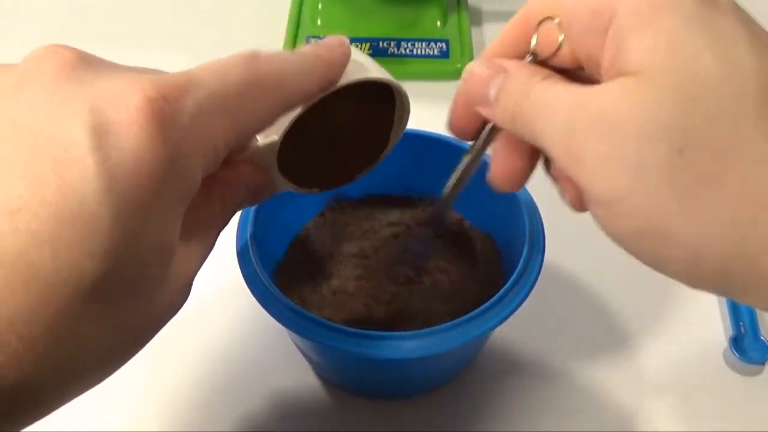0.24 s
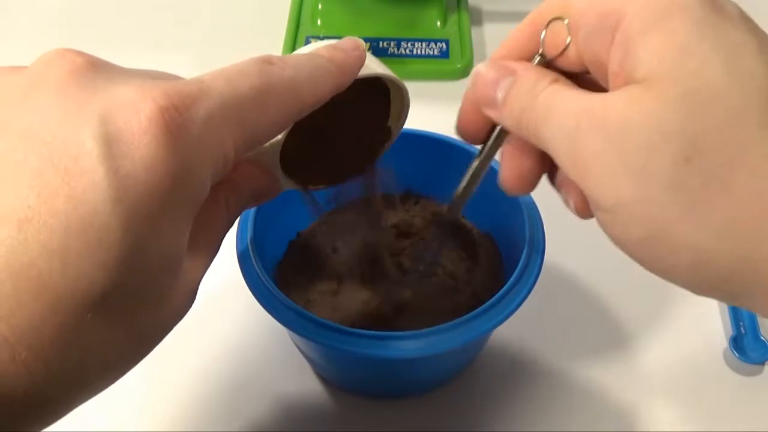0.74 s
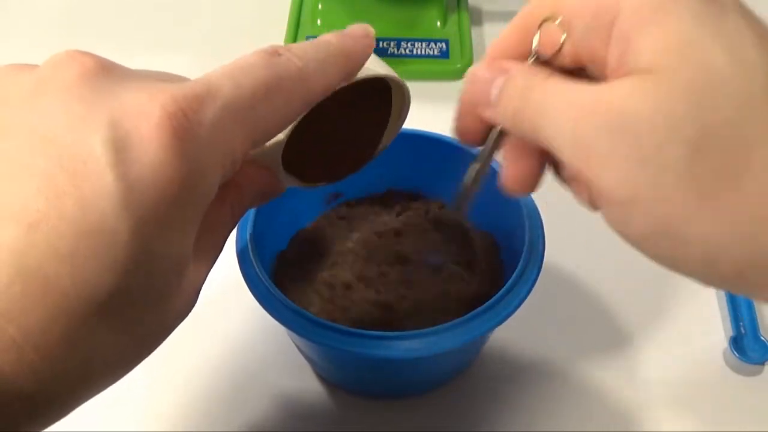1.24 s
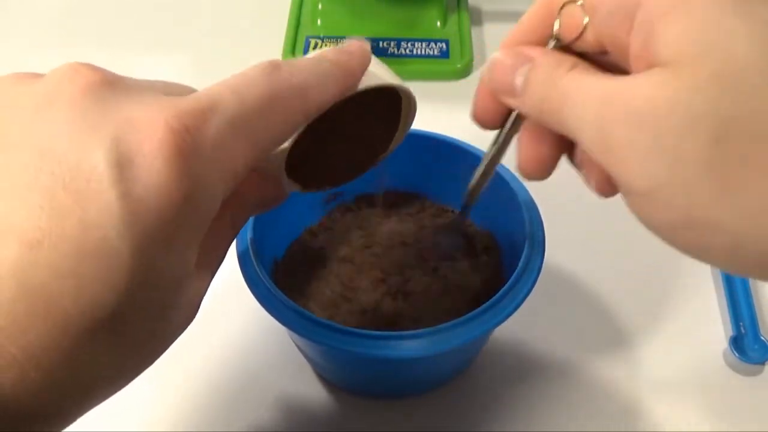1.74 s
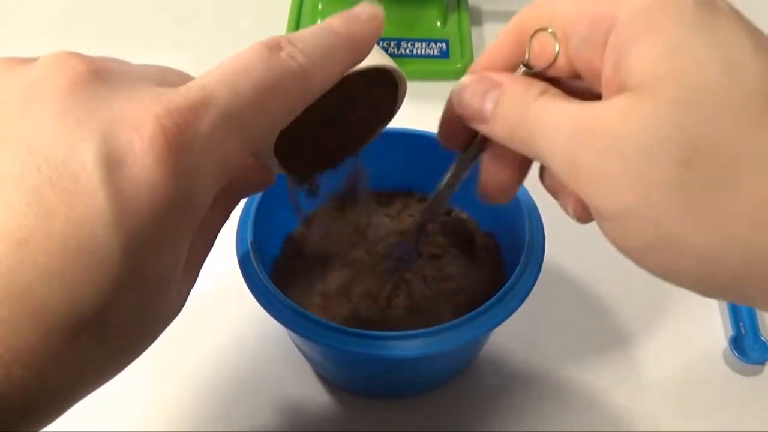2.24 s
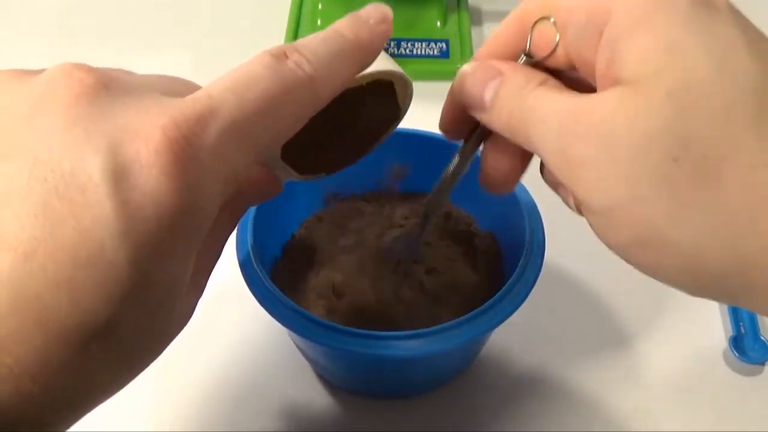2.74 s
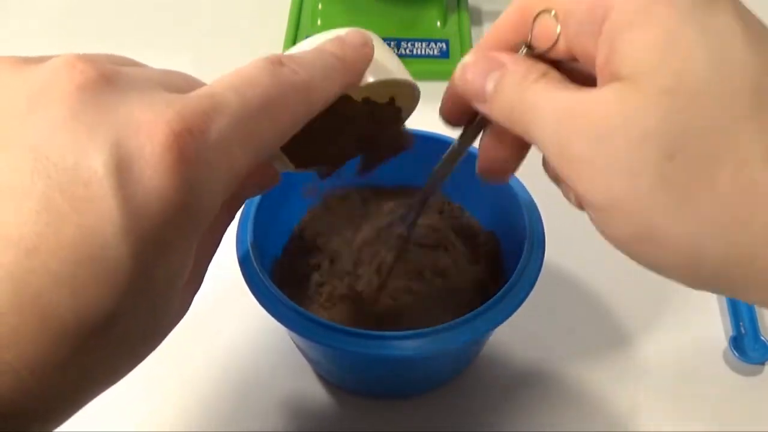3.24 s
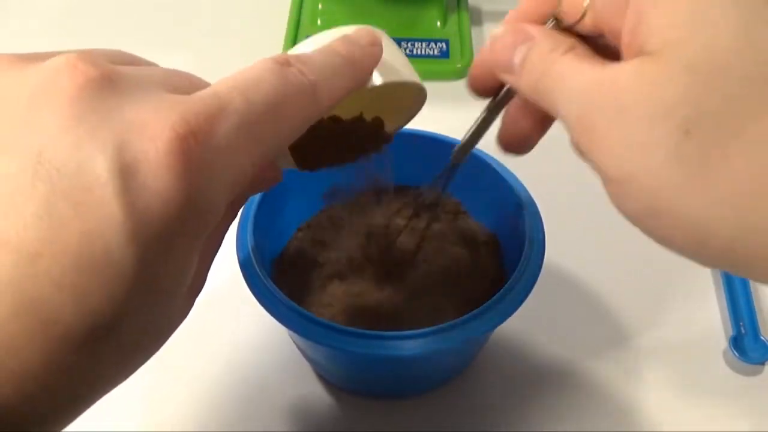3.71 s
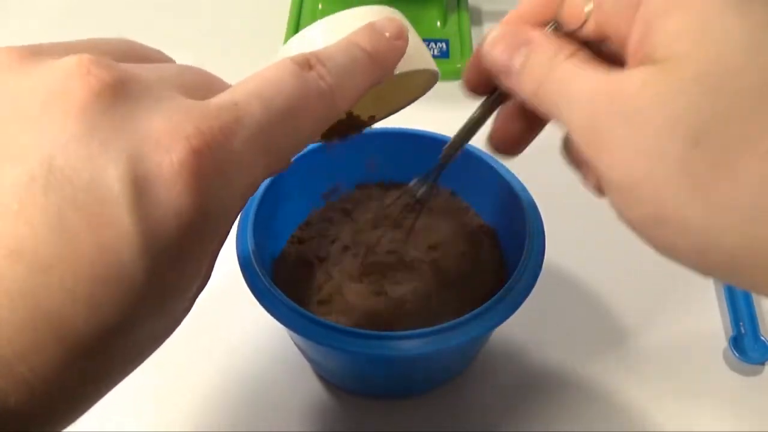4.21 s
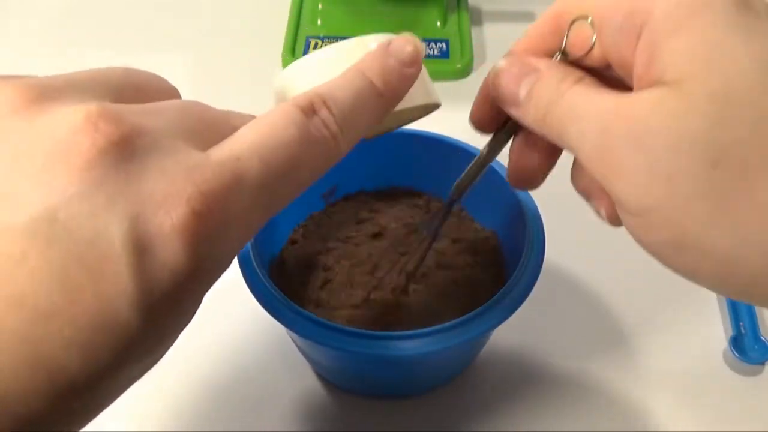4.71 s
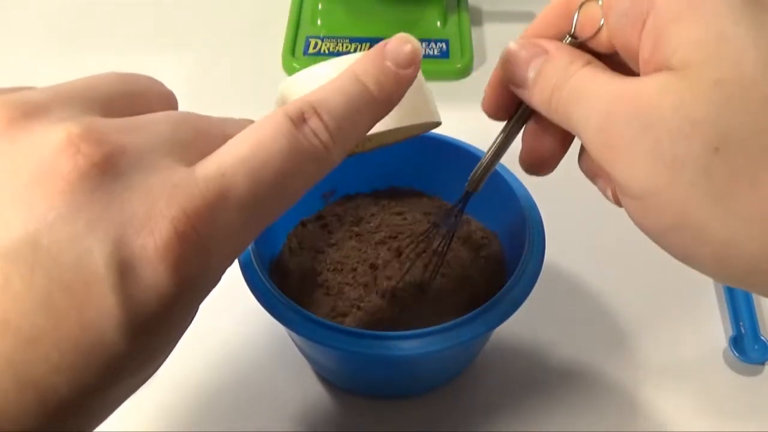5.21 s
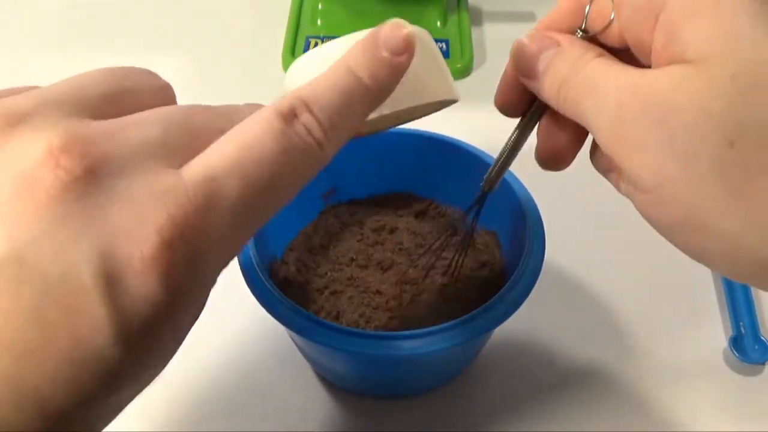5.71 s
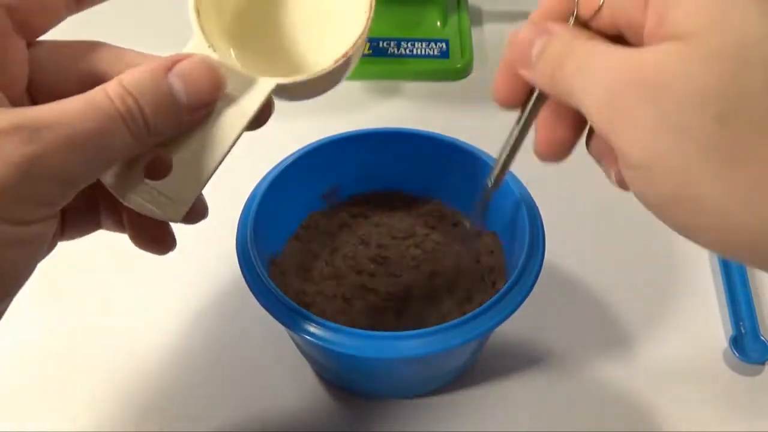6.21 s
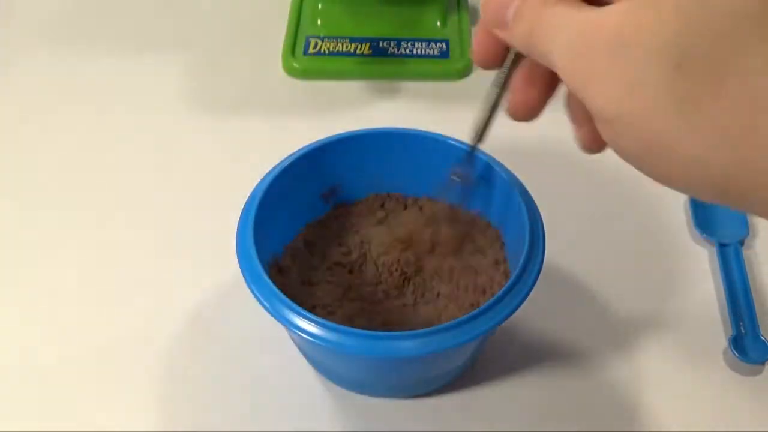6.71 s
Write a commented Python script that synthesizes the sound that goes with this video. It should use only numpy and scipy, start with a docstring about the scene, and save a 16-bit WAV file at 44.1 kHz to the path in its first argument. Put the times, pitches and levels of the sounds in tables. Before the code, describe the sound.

A small wire whisk circles briskly in a plastic bowl of damp powder, ticking and knocking the wall over soft gritty scraping.

```python
"""Wire whisk in a plastic bowl

A small wire whisk circles about four times a second in a plastic bowl of damp powder on a kitchen counter.
Bursts of wire contacts and grit dragged in between excite the resonant modes of the bowl wall.
Knocks and rocking push the low modes of the counter; all of it reaches a close pair of microphones
with a short diffuse tail and the faint air of the kitchen."""
import sys
import numpy as np
from scipy import signal
from scipy.fft import rfft, irfft, next_fast_len
from scipy.io import wavfile

SR = 44100
rng = np.random.default_rng(int(sys.argv[2]) if len(sys.argv) > 2 else 0)


def generate_wav(signal):
    """Clip the signal to [-1, 1] and save it as 16-bit WAV at the path in sys.argv[1]."""
    frames = np.transpose(np.atleast_2d(signal))
    scaled = np.clip(frames, -1, 1) * 32767
    pcm = np.round(scaled).astype(np.int16)
    wavfile.write(sys.argv[1], SR, pcm)


N = 306495   # length [samples]

# Wires meeting the wall, relative drive of three registers of modes:
# (time [s], low modes [dB], middle modes [dB], high modes [dB])
KNOCK_EVENTS = [(0.054, -19.5, -19.5, -25), (0.069, -28, -15, -41.0), (0.247, -38, -13, -29),
                (0.307, -10.5, -13, -22), (0.328, -36.5, -43, -51.5), (0.417, -42, -27.5, -32.0),
                (0.54, -20, -17.0, -27), (0.563, -33.5, -28, -37), (0.791, -16, -19, -21.5),
                (0.948, -27.5, -14.5, -27), (0.957, -34, -38, -49.5), (0.99, -36, -13, -28),
                (1.019, -20, -19.5, -24.5), (1.038, -33, -43.5, -57), (1.065, -41, -23.5, -37),
                (1.115, -49, -26.5, -42), (1.181, -38, -33, -53), (1.266, -21, -18, -28.0),
                (1.305, -37, -19.5, -33), (1.364, -53, -28, -27.5), (1.386, -50, -25.5, -44),
                (1.442, -40, -30.5, -35.5), (1.488, -36, -12.5, -26.0), (1.513, -23.5, -16.5, -27.5),
                (1.548, -35.5, -30, -41), (1.616, -68, -29, -37.5), (1.743, -41, -27, -33.5),
                (1.77, -17.0, -14, -21.5), (1.797, -27, -46, -56), (1.89, -29, -33.5, -37.5),
                (2.012, -37, -18.5, -34.5), (2.038, -32, -35.5, -38.0), (2.079, -45, -27, -40),
                (2.193, -32, -24, -47), (2.272, -44.5, -14, -32.5), (2.32, -24, -15.5, -27.5),
                (2.568, -16.5, -18, -21), (2.606, -46, -24, -36.5), (2.669, -37.5, -26.5, -33),
                (2.709, -33.5, -24.5, -48), (2.724, -27.5, -36, -54), (2.803, -30.5, -26.5, -38.5),
                (2.835, -60, -30.5, -44.5), (2.97, -39.5, -34, -56), (3.036, -39.5, -21.5, -27.0),
                (3.052, -30, -26.5, -34), (3.11, -53, -36, -61), (3.186, -46, -29.5, -55),
                (3.334, -19.5, -21.5, -25), (3.492, -50, -30, -47.5), (3.582, -20, -20, -30),
                (3.653, -53.5, -28.5, -44), (3.828, -28, -24, -31.5), (3.924, -31, -22.5, -26),
                (3.957, -31, -24, -31), (4.059, -47, -23.5, -41.5), (4.093, -21.0, -22.0, -32.5),
                (4.166, -30.5, -26, -39), (4.203, -31, -26, -43), (4.256, -32, -29.5, -45),
                (4.355, -23.5, -27, -27.5), (4.45, -46, -24.0, -30), (4.573, -20, -18.5, -27),
                (4.694, -32, -31, -43), (4.72, -38, -39.5, -39.0), (4.736, -39, -35, -65),
                (4.799, -19.5, -27.5, -27), (5.01, -48, -48, -37), (5.043, -25, -24, -25.0),
                (5.218, -39.5, -42.5, -67), (5.314, -40.5, -51, -65), (5.347, -28, -36, -50),
                (5.408, -50, -45, -49.0), (5.422, -33, -35.5, -48), (5.43, -35, -31, -51.5),
                (5.528, -17, -20.5, -25.5), (5.545, -40, -34, -35), (5.737, -19, -22.5, -24.5),
                (5.803, -34.5, -28, -33.0), (5.815, -23, -21.5, -39), (5.878, -33.0, -26, -42),
                (5.989, -22.5, -20.5, -25.5), (6.013, -38, -23, -34), (6.027, -23.5, -22.5, -32),
                (6.054, -30.5, -24.5, -26.5), (6.075, -34, -32.0, -40), (6.089, -32.5, -31.0, -38.5),
                (6.129, -32, -30, -47), (6.143, -34, -25.5, -39), (6.187, -28.5, -22, -43),
                (6.194, -22.5, -23, -27.5), (6.202, -33, -17.5, -29), (6.239, -27, -21.5, -27),
                (6.279, -58.0, -36, -31.5), (6.294, -31, -26.5, -30), (6.314, -29.5, -28.0, -31.5),
                (6.431, -19, -19.5, -27), (6.454, -29, -18.5, -26.0), (6.488, -58, -33.0, -27),
                (6.525, -35, -23, -28.5), (6.553, -24, -26, -42), (6.579, -26.5, -35.5, -59),
                (6.668, -20.0, -23, -31.5), (6.704, -28, -27, -37.5), (6.73, -34, -33, -37),
                (6.751, -27.5, -30, -23), (6.802, -28, -36, -35), (6.833, -24, -26.5, -38),
                (6.848, -31, -36, -56), (6.877, -51.5, -14.5, -29), (6.897, -39, -40, -29.5),
                (6.912, -19, -29, -28.5)]
# Modes of the bowl wall: (frequency [Hz], nominal bandwidth [Hz], relative level [dB])
BOWL_MODES = [(263.6, 29.4, -7), (379, 44.6, -6.5), (565, 41.5, -4.5), (760, 112, -6.5), (951, 102, 1.5),
              (1288, 191, 2), (1485, 147, 4.5), (1614, 192, 0), (1854, 208, -3.5), (2251, 162, 0.5),
              (2636, 317, -5.5), (3050, 242, -8.5), (4039, 239, -1), (5137, 410, -2.5), (5620, 1010, -6),
              (7190, 2150, -6.5), (8850, 1480, -2), (10590, 2170, -6.5), (12080, 1260, -12),
              (14700, 1800, -31.5)]


def amp(db):
    """Decibel definition: an amplitude ratio is ten to the power of dB / 20."""
    return 10 ** (np.asarray(db) / 20)


def rms_one(x):
    """Normalisation: divide by the root mean square, so that levels can be set afterwards."""
    return x / np.sqrt(np.mean(x ** 2) + 1e-20)


def at_hz(points, hz):
    """Logarithmic frequency axis: interpolate (frequency, value) pairs in the logarithm of frequency."""
    points = np.array(points)
    return np.interp(np.log(np.maximum(hz, 1)), np.log(points[:, 0]), points[:, 1])


def resonate(x, hz, width_hz):
    """Damped resonance: a two-pole filter whose pole radius sets the bandwidth, with gain 1 at the peak."""
    r = np.exp(-np.pi * width_hz / SR)
    zeros = [(1 - r * r) / 2, 0, (r * r - 1) / 2]
    poles = [1, -2 * r * np.cos(2 * np.pi * hz / SR), r * r]
    return signal.lfilter(zeros, poles, x + 1e-18)


def drift(rate_hz):
    """Low-passed noise: two equal real poles leave a slow random wander of spread about 1."""
    r = np.exp(-2 * np.pi * rate_hz / SR)
    wander = signal.lfilter([1], [1, -2 * r, r * r], rng.standard_normal(N + SR))
    return rms_one(wander[SR:])    # the first second lets the filter settle


def room_tone():
    """Stationary noise: spectrally shaped air noise, mostly common to both channels."""
    # Relative spectrum of the air: (frequency [Hz], density [dB per Hz])
    air_spectrum = [(20, -26.5), (60, 6), (180, -9.5), (370, -10), (1400, -14), (10000, -13),
                    (16000, -31.5)]
    level_db = -73
    hz = np.fft.rfftfreq(N, 1 / SR)
    noise = rng.standard_normal((2, N))
    noise = noise[0] + 0.23 * noise[1] * [[1], [-1]]
    shaped = irfft(rfft(noise) * amp(at_hz(air_spectrum, hz)), N)
    return amp(level_db) * rms_one(shaped)


def strokes():
    """Friction envelope: each stroke presses in, holds and eases off before the next; scrapes stand out."""
    # Strokes along the wall, each lasting until the next:
    # (start [s], drag level [dB], treble level [dB], fall of both at the end [dB])
    stroke_events = [(-.19, -36, -38.5, 12.5), (.05, -48.5, -55, 21), (.3, -52, -57, 13.5),
                     (.54, -51.5, -56, 13.5), (0.789, -45, -54, 4), (.94, -51, -55.5, 9),
                     (1.26, -46.5, -56.5, 13), (1.49, -52.5, -56, 17), (1.77, -51, -62, 2.5),
                     (2.01, -47, -50.5, 8), (2.27, -52, -56.5, 14), (2.57, -54, -59, 5),
                     (2.8, -45, -51, 14), (3.03, -53, -56.5, 15), (3.329, -52.5, -59, 18),
                     (3.58, -50, -55, 16.5), (3.83, -47, -59.5, 11), (4.06, -52.5, -56, 10),
                     (4.35, -48.5, -52.5, 19), (4.57, -57, -63.5, 6), (4.8, -61.5, -64.5, 26),
                     (5.04, -58, -67.5, 9.5), (5.22, -63, -74, 3), (5.33, -61.5, -82, 3),
                     (5.53, -50.5, -62, 29), (5.741, -54, -62.5, 14), (5.99, -45, -54.5, 15),
                     (6.19, -55, -59, 9), (6.43, -44.5, -50.5, 17.5), (6.67, -50, -58, 1.5),
                     (6.9, -55, -48, 3)]
    # Short rough scrapes: (centre [s], width of the swell [s], rise of drag and treble [dB])
    scrape_events = [(0.405, 0.043, 5.5), (0.965, 0.064, 1.5), (1.396, 0.067, 7.5), (2.091, 0.051, 0.5),
                     (2.35, 0.029, 6.5), (2.902, 0.046, 4.5), (3.438, 0.064, 2.5), (4.453, 0.041, 5.5),
                     (4.7, 0.069, 5), (5.238, 0.036, 7.5), (5.425, .04, 7), (5.87, 0.044, 8.5),
                     (6.225, 0.035, 17), (6.307, 0.044, 12.5), (6.544, 0.075, 7), (6.903, .05, 4)]
    press_s, ease_s = 0.053, 0.14   # pressure builds after the start, eases before the next stroke
    start, drag_db, treble_db, ease_db = np.transpose(stroke_events)
    end = np.append(start[1:], N / SR + ease_s)
    pressed = start + press_s
    easing = np.maximum(end - ease_s, pressed)
    corners = np.transpose([pressed, easing, end]).ravel()
    t = np.arange(N) / SR
    rough_db = sum(db * np.exp(-(2 * (t - centre) / length) ** 4) for centre, length, db in scrape_events)
    levels = []
    for db in (drag_db, treble_db):
        heights = np.transpose([db, db, db - ease_db]).ravel()
        levels.append(rough_db + np.interp(t, corners, heights))
    return levels


def drag(drag_db, bright_db, per_s, grain_db, lumpy_db, lumps_hz, roam_db, snags_per_s, snag_size, snag_ms, damping):
    """Granular friction: random clicks of grit, in clumps, ring wall modes damped by the pressing wires."""
    sizes = amp(grain_db * np.minimum(rng.exponential(1, N), 5)) * rng.choice([-1, 1], N)
    struck = rng.random(N) < per_s / SR
    grit = sizes * struck * amp(lumpy_db * drift(lumps_hz))
    # a wire catches and lets go: the clicks jump in strength, then die back
    snags = (rng.random(N) < snags_per_s / SR) * rng.exponential(snag_size, N)
    grit *= 1 + signal.lfilter([1], [1, -np.exp(-1000 / (snag_ms * SR))], snags)
    roam = amp(roam_db * drift(13.4))
    dull, bright = np.zeros(N), np.zeros(N)
    for m, (hz, width_hz, db) in enumerate(BOWL_MODES):
        treble_share = np.clip(np.log2(hz / 3000) / 1.72, 0, 1)
        # the contact roams: shifted copies of one wander swell each mode in turn, the treble least
        swell = np.roll(roam, m * N // len(BOWL_MODES)) ** (1 - 0.81 * treble_share)
        rung = (-1) ** m * amp(db) * resonate(grit * swell, hz, width_hz * damping)
        dull += (1 - treble_share) * rung
        bright += treble_share * rung
    return amp(drag_db) * rms_one(dull) + amp(bright_db) * rms_one(bright)


def knocks(level_db, scatter_db, ring, first, blur):
    """Modal impact: bursts of contacts ring the wall nearby; the room's share is one click per knock, modes blurred."""
    # Centres of the low, middle and high registers [Hz]
    register_centres = [900, 3300, 9500]
    s, low, middle, high = np.transpose(KNOCK_EVENTS)
    # typical decay time 2.32 ms with random log spread; weaker knocks glance and last longer
    glancing = -0.014 * (np.maximum(low, middle) + 20)
    contact_ms = 2.32 * np.exp(0.22 * rng.standard_normal(len(s)) + glancing)
    contact = np.clip(contact_ms, .2, 12)[:, None] * SR / 1000    # in samples
    k = np.arange(SR // 40)
    bursts = rng.standard_normal((len(s), len(k))) * np.exp(-k / contact)
    bursts *= 1.57 * (1 - np.exp(-k / (0.46 * contact)))    # the wires land one after another
    # the hardest touch comes 1 ms into the burst
    bursts[:, SR // 1000] += first * rng.choice([-1, 1], len(s)) * rng.uniform(0.29, 1, len(s))
    start = np.round(s * SR).astype(int) - SR // 2000    # the swell begins 0.5 ms ahead of the listed time
    at = np.minimum(start[:, None] + k, N - 1)
    scatter = rng.normal(0, scatter_db, (len(s), len(BOWL_MODES)))    # every knock strikes each mode differently
    near, far = np.zeros(N), np.zeros(N)
    for m, (hz, width_hz, db) in enumerate(BOWL_MODES):
        weights = [at_hz(list(zip(register_centres, one)), hz) for one in np.eye(3)]
        strength = amp(level_db + db + weights @ np.array([low, middle, high]))
        softening = np.exp(-k * hz / SR / 62.0)    # later touches reach the high modes less
        gain = (strength * amp(scatter[:, m]))[:, None]
        force = np.bincount(at.ravel(), (bursts * softening * gain).ravel(), N)
        near += (-1) ** m * resonate(force, hz, width_hz * ring)
        click = np.bincount(start, strength * np.sqrt(contact[:, 0]), N)
        far += (-1) ** m * resonate(click, hz, width_hz * blur)
    return near, far


def counter(level_db, push_ms, drag_db, rub_db, stiff_hz):
    """Forced vibration: soft pushes from knocks and rocking, and noise from dragging, drive the counter's low modes."""
    # Modes of the counter: (frequency [Hz], bandwidth [Hz], relative level [dB])
    counter_modes = [(54.6, 25, -4.5), (75, 14, 1), (132.3, 9.2, 4)]
    # The bowl rocks on the counter: (time [s], relative push of deep modes [dB], of the upper mode [dB])
    rocking = [(0.064, -47.5, -42.5), (0.569, -52, -52), (0.846, -54, -53), (1.062, -53.5, -50.5),
               (1.297, -47, -46.5), (1.55, -58, -56), (1.767, -56, -49), (1.817, -59, -54),
               (2.114, -58, -60.5), (2.358, -57, -74), (2.601, -52, -44), (2.885, -56, -52),
               (3.576, -55, -53.5), (3.919, -57, -63), (4.16, -56, -56), (4.195, -58, -66),
               (5.736, -61, -52), (6.235, -55, -47.5), (6.448, -53, -53), (6.661, -62, -60),
               (6.748, -56, -71), (6.923, -75, -38.5)]
    # every knock pushes the counter too, far below its low wall modes
    pushes = [(s, low - 39, low - 50) for s, low, *_ in KNOCK_EVENTS]
    s, deep_db, upper_db = np.transpose(list(rocking) + pushes)
    at, out = np.round(s * SR).astype(int), np.zeros(N)
    t_ms = np.arange(SR // 20) * 1000 / SR
    push = t_ms * np.exp(-t_ms / push_ms)
    push /= push.sum()
    rub = rng.standard_normal(N) * amp(rub_db + 0.78 * drag_db)
    for hz, width_hz, db in counter_modes:
        mode_db = upper_db if hz > 110 else deep_db
        clicks = np.bincount(at, amp(level_db + mode_db), N)
        force = np.convolve(clicks, push)[:N] + rub
        out += amp(db) * resonate(force, hz, width_hz)
    return signal.sosfilt(signal.butter(2, stiff_hz, "high", fs=SR, output="sos"), out)


def kitchen(x, onset_ms, alike):
    """Diffuse reverberation: noise decays exponentially band by band, partly correlated between channels."""
    # Reverberation of the kitchen: (frequency [Hz], time to fall by 60 dB [s])
    decay_times = [(100, 0.25), (4000, 0.15), (14000, 0.14)]
    t, tail = np.arange(SR // 2) / SR, 0
    white = rng.standard_normal((2, len(t)))
    edges = 70 * 2.0 ** np.arange(9)    # octave bands
    for low, high in zip(edges, edges[1:]):
        band = signal.sosfilt(signal.butter(2, [low, high], "band", fs=SR, output="sos"), white)
        t60 = at_hz(decay_times, np.sqrt(low * high))
        tail = tail + band * amp(-60 * t / t60)
    tail *= 1 - np.exp(-t * 1000 / onset_ms)
    tail = np.sqrt(1 + alike) * tail[0] + np.sqrt(1 - alike) * tail[1] * [[1], [-1]]
    tail /= np.sqrt(np.sum(tail ** 2) / 2)    # unit energy per channel on average
    return signal.fftconvolve(x[None], tail, axes=1)[:, :N]


def scene():
    """Superposition: direct sound, with a phase difference between two microphones, plus tail and air."""
    # Phase lead of left over right: (frequency [Hz], phase [rad])
    phase_lead = [(60, -0.12), (300, -0.2), (950, -0.68), (5000, -0.29), (7500, 0.99), (10300, -0.46),
                  (15000, 0.49)]
    drag_db, bright_db = strokes()
    near, far = knocks(level_db=13.5, scatter_db=2.5, ring=1.21, first=5.67, blur=1.27)
    grit = drag(drag_db, bright_db, per_s=4000., grain_db=2.5, lumpy_db=2.5, lumps_hz=45., roam_db=5.0,
                snags_per_s=70., snag_size=1.4, snag_ms=1.8, damping=1.6)
    rumble = counter(level_db=59.0, push_ms=1.33, drag_db=drag_db, rub_db=-12.0, stiff_hz=37.0)
    close = near + grit + rumble
    size = next_fast_len(N + SR)
    lead = at_hz(phase_lead, np.fft.rfftfreq(size, 1 / SR))
    turn = np.exp(.5j * lead * [[1], [-1]])    # half the phase to each side
    direct = irfft(rfft(close, size) * turn, size)[:, :N] * amp([[-.15], [.15]])
    tail = kitchen(amp(-7.0) * far + amp(-6.0) * grit, onset_ms=1.0, alike=0.87)
    return direct + tail + room_tone()


def record(dry):
    """Band limiting: a steep low-pass filter holds everything above 16.9 kHz at least 70 dB down."""
    return signal.sosfilt(signal.cheby2(12, 70, 16900, fs=SR, output="sos"), dry)


dry = scene()
out = record(dry)
generate_wav(out)
```